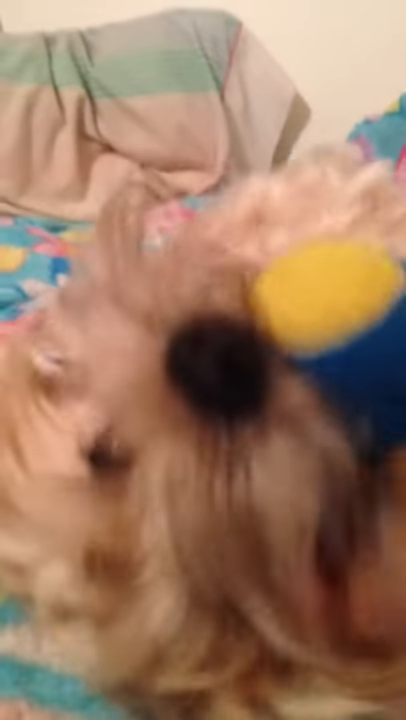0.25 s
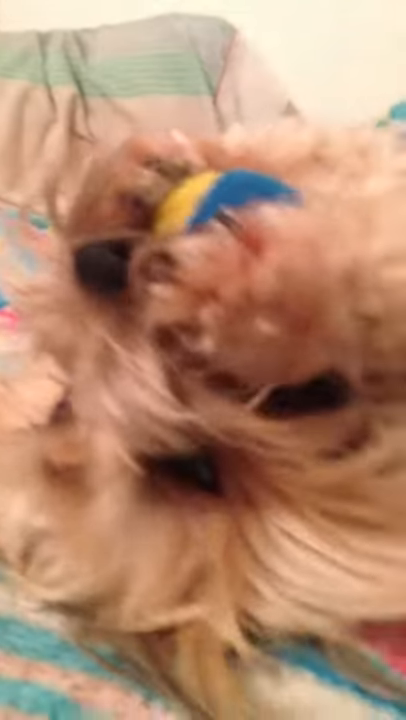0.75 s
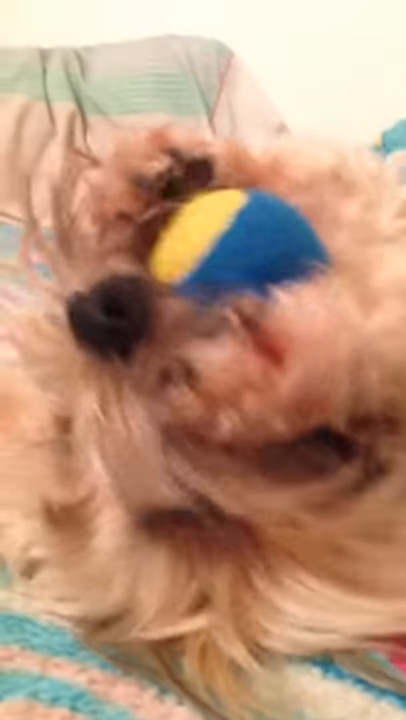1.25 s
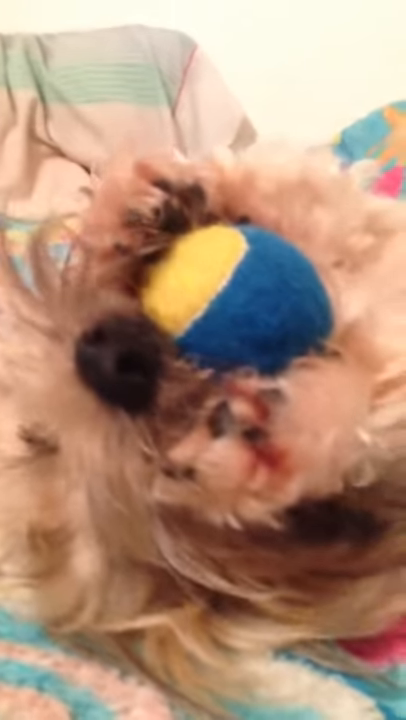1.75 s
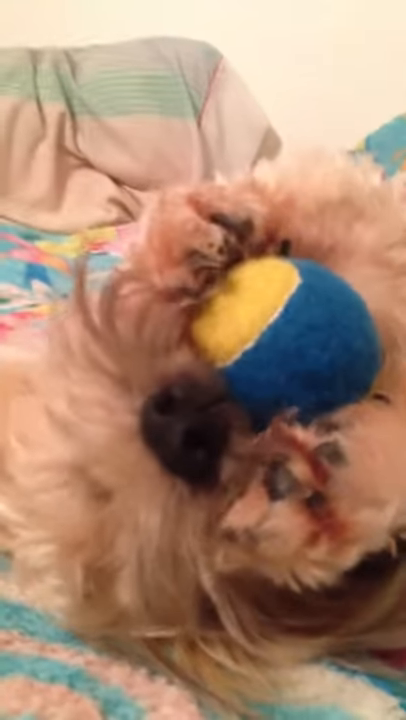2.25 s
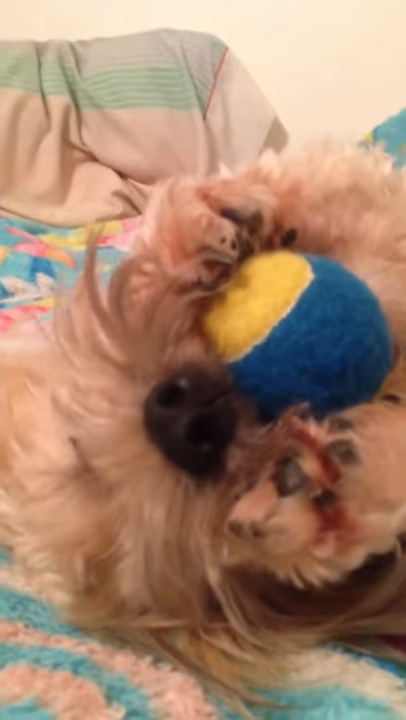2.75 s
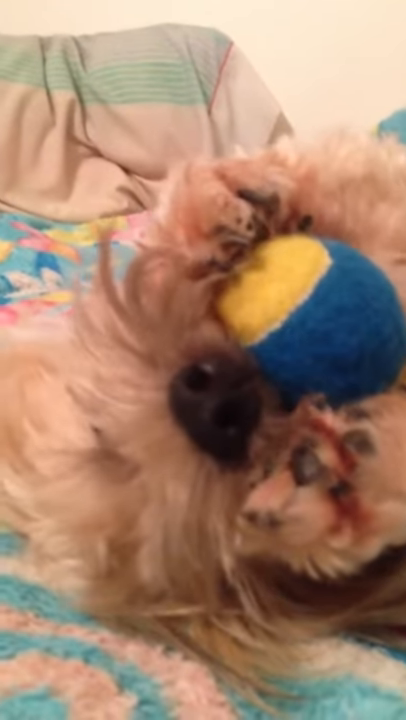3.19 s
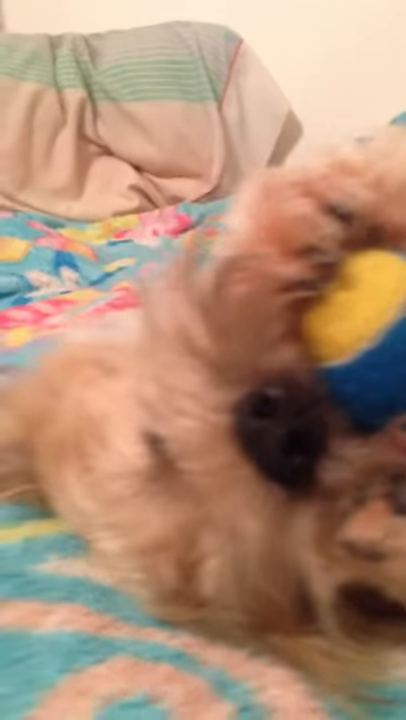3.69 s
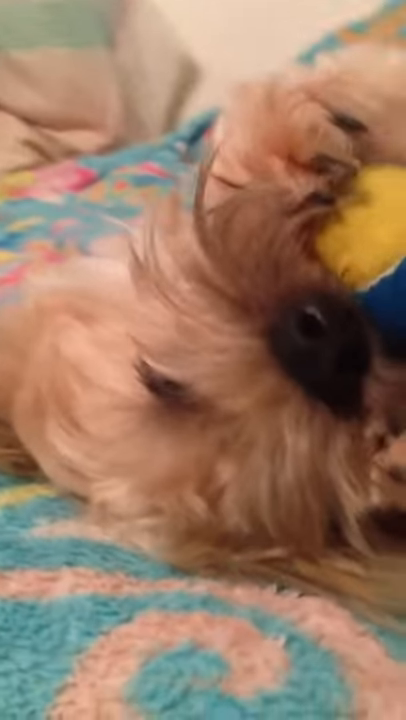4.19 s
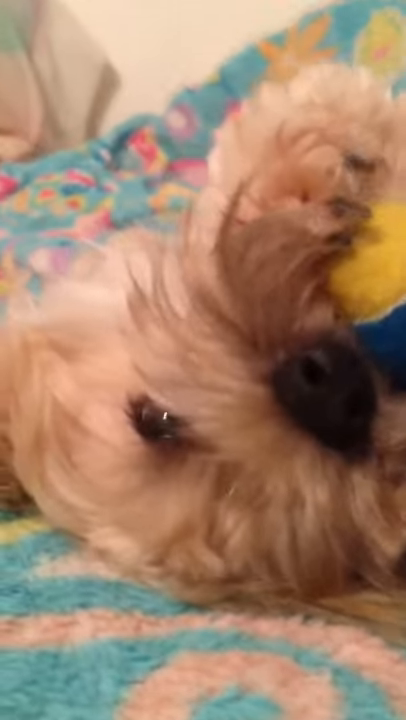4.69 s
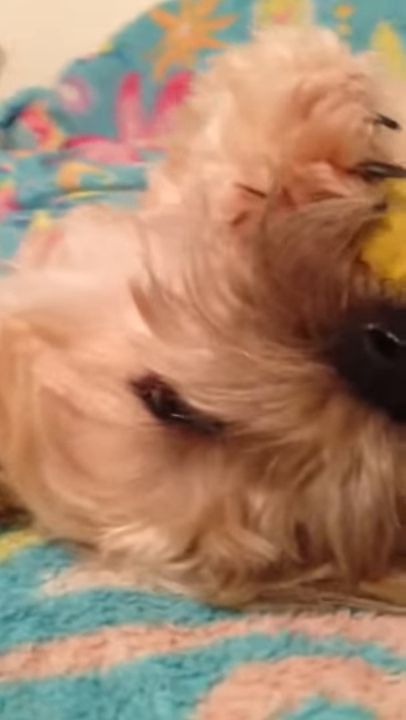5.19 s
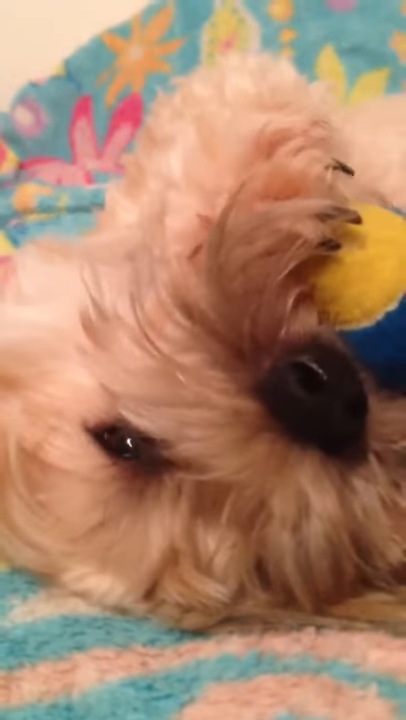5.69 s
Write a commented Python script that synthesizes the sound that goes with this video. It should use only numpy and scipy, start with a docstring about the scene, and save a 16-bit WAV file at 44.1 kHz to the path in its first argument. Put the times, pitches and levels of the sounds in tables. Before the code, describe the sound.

Near-silent chewing with thin airy whistles gives way to four sharp, high toy squeaks, each answered by a softer squeak as the ball springs back.

```python
"""Dog chewing a squeaker ball

A small dog lies on a blanket and chews a squeaker ball, close to the microphone in a quiet, soft room.
A slow squeeze leaks air in thin whistles. Then four quick bites blow the reed: it climbs, shuts with a thump
and sounds again as the jaw eases. Each time the ball springs back, it sucks air through the reed in a squeak.
The reed is a sum of harmonics plus pulsing air noise; leaks are wavering sines; rubs and room are shaped noise."""
import sys
import numpy as np
from scipy import signal
from scipy.fft import rfft, irfft, next_fast_len
from scipy.io import wavfile
from scipy.ndimage import uniform_filter1d, map_coordinates

SR = 44100
rng = np.random.default_rng(int(sys.argv[2]) if len(sys.argv) > 2 else 0)


def pcm_store(signal):
    """Save signal as 16-bit PCM."""
    levels = np.round(np.clip(np.atleast_2d(signal), -1, 1) * 32767)
    wavfile.write(sys.argv[1], SR, levels.astype(np.int16).T)


N = 261954  # length in samples
TOP_HZ = 15450  # upper band limit


def amp(db):
    """Turn decibels into gain."""
    return 10 ** (np.asarray(db) / 20)


def unit(x):
    """Scale to an average (rms) level of 1."""
    return x / np.sqrt(np.mean(x ** 2) + 1e-20)


def along(points, hz):
    """Read (pitch_hz, value) points between their entries, on a log pitch axis."""
    point_hz, values = np.transpose(points)
    return np.interp(np.log(hz + 1), np.log(point_hz + 1), values)


def trace(rows):
    """Draw each column after the time, sample by sample from the first row to the last."""
    row_s, *columns = np.transpose(rows)
    t = np.arange(row_s.min(), row_s.max(), 1 / SR)
    return [np.interp(t, row_s, column) for column in columns]


def clock(length_s):
    """Give the time in seconds and the share 0-1 of a stroke this long."""
    t = np.arange(int(length_s * SR)) / SR
    return t, t / t[-1]


def add(track, start_s, sound):
    """Mix a sound into the track."""
    part = track[max(round(start_s * SR), 0):][:len(sound)]
    part += sound[:len(part)]


def faded(x, edge):
    """Fade a sound in and out over edge seconds."""
    t = np.arange(len(x)) / SR
    return x * np.clip(np.minimum(t, t[::-1]) / edge, 0, 1)


def wobble(n, rate):
    """Draw a smooth random curve with rate random points a second."""
    knots = rng.standard_normal(int(n * rate / SR) + 4)
    return map_coordinates(knots, [np.arange(n) * rate / SR])


def noise(n, spectrum):
    """Shape white noise by a spectrum and scale it to rms 1."""
    m = next_fast_len(n + SR // 8)
    gain = amp(along(spectrum, np.fft.rfftfreq(m, 1 / SR)))
    shaped = irfft(rfft(rng.standard_normal(m)) * gain, m)
    return unit(shaped)[:n]


def causal(spectrum, hz, size=2048):
    """Complex gain of a passive body with this spectrum: it answers only after it is struck (minimum phase)."""
    grid = np.fft.rfftfreq(size, 1 / SR)
    cepstrum = irfft(np.log(amp(along(spectrum, grid))))
    return np.exp(np.interp(hz, grid, rfft(2 * cepstrum[:size // 2], size)))


# Tone colour of air rushing past the reed: pitch_hz, level_db
AIR_COLOUR = [(100, -39), (800, -33.5), (1400, -22), (2400, -8), (4000, 3), (6500, 4.5), (9500, 7),
              (11000, -1), (12500, -7.5), (15500, -17.5)]


def reed(hz, tone_db, air_db, horn, jitter, dulling):
    """The reed slaps once a cycle into its little horn; turbulent air passes in step with it."""
    n = len(hz)
    hz = hz * (1 + jitter * amp(air_db - tone_db) * wobble(n, 810))  # turbulence unsettles a weak beat
    phase = 2 * np.pi * np.cumsum(hz) / SR
    k = np.arange(1, 19)[:, None]  # harmonic numbers
    # A weak blow shuts the reed gently, which dulls the high harmonics
    softness = amp(-dulling * (tone_db.max() - tone_db) * np.log2(k))
    partials = causal(horn, k * hz) * softness * (k * hz < TOP_HZ)
    pulses = (partials * np.exp(1j * k * phase)).real.sum(0)
    pulses = pulses / np.sqrt((abs(partials) ** 2).sum(0) / 2)  # even level whatever the colour
    tone = amp(tone_db + .5 * wobble(n, 700)) * pulses
    air = amp(air_db) * unit(noise(n, AIR_COLOUR) * (1 + .5 * np.cos(phase)))
    return faded(tone + air, edge=0.00093)


# The jaw closes on the ball:
# start_s, length_s, time_to_overblow_s, highest_pitch_hz, level_db, lead_of_first_puff_s, thump_db
BITES = [(2.5193, .05, 0.042, 2090, -8, 0.046, -23.5), (3.249, 0.053, 0.039, 3800, -7, 0.029, -21),
         (4.2198, .048, .038, 3800, -7.5, .031, -23), (5.195, 0.055, 0.041, 3800, -8, 0.052, -27)]
# Tone colour of the reed when blown: pitch_hz, level_db
BLOWN_COLOUR = [(300, -36), (900, -16), (1250, -8), (2500, 1.5), (3800, 2.5), (5100, 1), (6400, 1.5),
                (8800, 5.5), (10200, 1), (11500, -9.5), (13000, -16), (15500, -27.5)]
REED_HZ, CREEP_HZ_PER_S = 1222, 2300  # the reed's own pitch and its slow rise under pressure
JUMP_HZ, JUMP_S = 1068, .0011  # overblown, it jumps almost an octave
CLIMB_HZ, CLIMB_S = 1356, .012  # then it climbs by this many Hz in the first 12 ms, ever faster
PRESS_SWELL_DB = 7.5  # growth of the tone
PRESS_AIR_DB, PRESS_AIR_SWELL_DB = -14, 11.5  # air noise relative to the tone at the top, and its extra growth


def presses():
    """Pressure builds: the reed grows louder and airier, creeps upward, then overblows and climbs."""
    out = np.zeros(N)
    for start_s, length_s, overblow_s, top_hz, level_db, *_ in BITES:
        t, _ = clock(length_s)
        jump = (1 + np.tanh((t - overblow_s) / JUMP_S / 2)) / 2
        climb = (np.maximum(t - overblow_s, 0) / CLIMB_S) ** 2
        hz = REED_HZ + CREEP_HZ_PER_S * t + JUMP_HZ * jump + CLIMB_HZ * climb
        hz = np.minimum(hz, top_hz)
        to_go = np.maximum(1 - t / overblow_s, 0)
        tone_db = level_db - PRESS_SWELL_DB * to_go
        air_db = tone_db + PRESS_AIR_DB - PRESS_AIR_SWELL_DB * to_go
        add(out, start_s, reed(hz, tone_db, air_db, BLOWN_COLOUR, jitter=0.028, dulling=0.055))
    return out


# The jaw eases and the reed sounds again:
# start_s, length_s, first_pitch_hz, fall_curve (1 = even), level_db, fade_db, air_noise_db, thump_db
JAW_EASES = [(2.5695, .0475, 2075, 1.08, -7, 8.1, -28.5, -24.5),
             (3.324, 0.04, 2940, 1.9, -6.5, 7.3, -22.5, -21.5),
             (4.297, .034, 2955, 1.9, -7, 7.7, -25.5, -28),
             (5.274, .0352, 2975, 1.74, -7.5, 6.1, -24.5, -27.5)]
SLACK_HZ, SNAP_HZ = 1024, 3900  # lowest and last pitch
SLACK_AT, SLACK_CURVE = .53, 1.8  # share of the stroke at the lowest pitch, curve of the rise
SLACK_DIP_DB, SLACK_WIDTH = 14, .18  # dip where the reed is slack, and its width as a share of the stroke


def eases():
    """Pitch and level sink as the reed goes slack, then rise until it snaps shut."""
    out = np.zeros(N)
    for start_s, length_s, first_hz, fall_curve, level_db, fade_db, air_db, _ in JAW_EASES:
        _, share = clock(length_s)
        falling = np.maximum(1 - share / SLACK_AT, 0)
        rising = np.maximum((share - SLACK_AT) / (1 - SLACK_AT), 0)
        fall = (first_hz / SLACK_HZ) ** (falling ** fall_curve)
        rise = (SNAP_HZ / SLACK_HZ) ** (rising ** SLACK_CURVE)
        hz = SLACK_HZ * fall * rise
        slack_dip = SLACK_DIP_DB * np.exp(-((share - SLACK_AT) / SLACK_WIDTH) ** 2)
        tone_db = level_db - fade_db * share - slack_dip
        add(out, start_s, reed(hz, tone_db, air_db, BLOWN_COLOUR, jitter=0.061, dulling=0.084))
    return out


# The ball springs back fast after a bite: start_s, length_s, first_pitch_hz (before the kick), level_db, fade_db
FAST_REFILLS = [(2.681, 0.078, 2306, -14, 12), (3.429, .08, 2293, -14.5, 10.5),
                (4.393, 0.087, 2303, -14, 11.5), (5.425, 0.08, 2310, -15.5, 10)]
# The ball fills gently after the slow squeeze: same columns
GENTLE_REFILLS = [(1.922, 0.066, 1243, -21, 0.91)]
# Tone colour of the reed when sucked: pitch_hz, level_db
SUCKED_COLOUR = [(300, -38), (900, 6), (1250, -8.5), (2400, 0), (3800, 0), (5000, -3), (6300, -2.5),
                 (7600, -12.5), (8800, -8), (10100, -0.5), (11300, -8.5), (12600, -8.5), (15200, -16.5)]
# Tone colour of the reed when gently sucked: pitch_hz, level_db
GENTLE_COLOUR = [(300, -35.5), (900, 4.5), (1250, -8), (2500, 0.5), (3800, -2), (5000, -5.5), (6300, -6),
                 (7550, -15), (8800, -4.5), (10100, -2.5), (11300, -2.5), (12600, -7), (13800, -14.5),
                 (15200, -18)]
SUCKED_HZ, SETTLE_S, SETTLE_CURVE = 1264, .0235, 1.9  # pitch the sucked reed settles on, how fast, shape
SAG_CURVE, SAG_HZ, SAG_DB = 5.8, 407.3, 16.5  # lateness of the last sag, its fall of pitch and of level
KICK_S = .0018  # a sudden release overshoots in pitch this briefly


def refills(strokes, horn, kick_hz, air_db, jitter, dulling):
    """Suction is strongest at first: the pitch settles on the reed's own, then sags and dies as the ball fills."""
    out = np.zeros(N)
    for start_s, length_s, first_hz, level_db, fade_db in strokes:
        t, share = clock(length_s)
        sag = share ** SAG_CURVE
        settling = (first_hz - SUCKED_HZ) * np.exp(-(t / SETTLE_S) ** SETTLE_CURVE)
        kick = kick_hz * np.exp(-t / KICK_S)
        hz = SUCKED_HZ + settling + kick - SAG_HZ * sag
        tone_db = level_db - fade_db * share - SAG_DB * sag
        add(out, start_s, reed(hz, tone_db, tone_db + air_db, horn, jitter, dulling))
    return out


# Faint ring of the squeaker: pitch_hz, level_db (before a 13 dB cut), time_to_fall_60_db_s
RING_MODES = [(5170, -37, .09), (8900, -30.5, 0.14)]


def squeaker_ring(x):
    """The squeaker keeps ringing faintly at its own modes."""
    t = np.arange(SR // 4) / SR
    ring = np.zeros(len(t))
    for hz, level_db, fall_s in RING_MODES:
        ring += amp(level_db - 13.0 - 60 * t / fall_s) * np.sin(2 * np.pi * hz * t)
    return signal.fftconvolve(x, ring)[:N]


def whistle(hz, waver):
    """An edge tone of about rms 1 whose pitch wavers with the jet."""
    wavering_hz = hz * (1 + waver * wobble(len(hz), 400))
    return np.sqrt(2) * np.sin(2 * np.pi * np.cumsum(wavering_hz) / SR)


def shuts():
    """List (start_s, thump_db) where the reed stops the flow: as it overblows and at the end of each ease."""
    overblown = [(start_s + overblow_s, db) for start_s, _, overblow_s, *_, db in BITES]
    snapped = [(start_s + length_s - .0015, db) for start_s, length_s, *_, db in JAW_EASES]
    return overblown + snapped


# Air whistles past the shut reed at the height of a bite: start_s, length_s, whistle_db, air_noise_db
CHOKED_WHISTLES = [(3.3007, 0.028, -15.5, -19.5), (4.2648, .0112, -18, -17.5), (5.25, .0248, -16, -20.5)]
# Tone colour of the open port: pitch_hz, level_db
PORT_COLOUR = [(1000, -16.5), (7000, -14), (9400, -5), (11000, -13.5), (16000, -31)]
# The reed's upper mode screeches in the first bite: start_s, length_s, level_db
SCREECH_BURST = (2.5335, .029, -14.5)
# Tone colour of that upper mode: pitch_hz, level_db
SCREECH_COLOUR = [(3000, -52.5), (5800, -17.5), (6700, 0.5), (8500, 1), (9600, -4.5), (11000, -15.5),
                  (16000, -29.5)]
CHOKE_HZ, CHOKE_PEAK_S, CHOKE_ARCH_HZ = 5480, .0092, 510  # top of the whistle's arch, when it comes, its height
PUFF_DB = -55.5  # air starts to move before a bite


def escaping_air():
    """Air that bypasses the reed's beat: first puffs, choked whistles, last hisses and a screech."""
    out = np.zeros(N)
    for start_s, length_s, whistle_db, air_db in CHOKED_WHISTLES:
        t, _ = clock(length_s)
        hz = CHOKE_HZ - CHOKE_ARCH_HZ * (t / CHOKE_PEAK_S - 1) ** 2
        tone = whistle(hz, waver=.008) + amp(-12.5) * whistle(2 * hz, waver=0.0066)
        choked = amp(whistle_db) * tone + amp(air_db) * noise(len(t), AIR_COLOUR)
        add(out, start_s, faded(choked, edge=0.00044))
    for start_s, *_, lead_s, _ in BITES:
        puff = faded(noise(int(0.055 * SR), PORT_COLOUR), edge=0.009)
        add(out, start_s - lead_s, amp(PUFF_DB) * puff)
    t, _ = clock(.1)
    for start_s, thump_db in shuts():
        # The last hiss falls 60 dB in 0.04 s
        add(out, start_s, amp(thump_db - 60 * t / 0.04) * noise(len(t), AIR_COLOUR))
    start_s, length_s, level_db = SCREECH_BURST
    screech = faded(noise(int(length_s * SR), SCREECH_COLOUR), edge=.002)
    add(out, start_s, amp(level_db) * screech)
    return out


def leak(hz, level_db):
    """A thin, unsteady, airy whistle."""
    unsteady = unit(1 + .35 * wobble(len(hz), 50) + .55 * wobble(len(hz), 450))
    return faded(amp(level_db - .5) * whistle(hz, waver=0.0088) * unsteady, edge=.014)


# Short thin whistles from the slowly squeezed ball:
# start_s, length_s, first_pitch_hz, last_pitch_hz, rise_at_swell_hz, level_db (before a 0.5 dB cut)
SHORT_LEAKS = [(.3, 0.15, 5230, 4930, -4, -71), (.33, .12, 7270, 6730, -38, -64),
               (0.451, 0.084, 4680, 5060, 40, -66), (0.456, 0.07, 6800, 6550, 132, -69),
               (0.878, .032, 4150, 3980, 20, -59), (1.44, .145, 4680, 5190, 170, -61),
               (1.506, .25, 6270, 6170, 209.5, -66.5), (1.56, .18, 4300, 4080, -9, -71.5),
               (1.742, 0.071, 4760, 4740, 39, -63)]
# The longest leak sinks as the ball empties: time_s, pitch_hz, level_db (before a 2.5 dB cut in all)
SINKING_LEAK = [(0.53, 4463, -58), (0.556, 3970, -60), (0.576, 4300, -58), (0.594, 4270, -55),
                (0.614, 3884, -53.5), (0.658, 4090, -55), (0.678, 3737, -60), (0.732, 3880, -56),
                (0.758, 3639, -65.5), (0.88, 3652, -69)]


def leaks():
    """Under slow pressure the reed stays still; leaks swell, glide and fade."""
    out = np.zeros(N)
    for start_s, length_s, first_hz, last_hz, rise_hz, level_db in SHORT_LEAKS:
        _, share = clock(length_s)
        swell = 4 * share * (1 - share)
        hz = first_hz + (last_hz - first_hz) * share + rise_hz * swell
        add(out, start_s, np.sqrt(swell) * leak(hz, level_db))
    hz, level_db = trace(SINKING_LEAK)
    add(out, SINKING_LEAK[0][0], leak(hz, level_db - 2.0))
    return out


# The ball's dull answer, before the low cut: pitch_hz, level_db
THUMP_COLOUR = [(40, -49), (90, -23.5), (130, -9), (175, 2.5), (260, -1.5), (380, -10.5), (600, -16.5),
                (900, -41.5), (2000, -51)]
# Teeth on the ball: start_s, level_db, pitch_hz, time_to_fall_60_db_s
TOOTH_TAPS = [(0.0595, -37, 674, 0.0049), (0.103, -35, 656, 0.02), (1.8943, -32.5, 780, 0.0077)]


def thumps():
    """The ball thumps whenever the reed shuts; teeth tap on it with a short ring and a noisy tick."""
    out = np.zeros(N)
    t = np.arange(SR // 10) / SR
    thump = irfft(causal(THUMP_COLOUR, np.fft.rfftfreq(len(t), 1 / SR), size=16384))
    for start_s, thump_db in shuts():
        add(out, start_s, amp(thump_db) * thump / abs(thump).max())
    for start_s, level_db, hz, fall_s in TOOTH_TAPS:
        ring = np.sin(2 * np.pi * hz * t) * amp(-60 * t / fall_s)
        tick = amp(-21.5 - 60 * t / 0.0035) * rng.standard_normal(len(t))
        add(out, start_s, amp(level_db) * (ring + tick))
    low_cut = signal.butter(2, 100, "highpass", fs=SR, output="sos")
    return signal.sosfilt(low_cut, out)


# Soft rubs and bumps of the dog on the blanket: start_s, length_s, level_db, pitch_hz, fall_per_octave_above_db
BLANKET_RUBS = [(4.365, 0.07, -55.5, 358, 23), (4.829, 0.34, -67.5, 1500, 9),
                (5.167, 0.052, -50.5, 320, 21.5), (5.19, 0.092, -40.5, 168, 20)]


def blanket():
    """Dull rubs as the dog's weight shifts: low noise that swells and fades."""
    out = np.zeros(N)
    for start_s, length_s, level_db, hz, fall_db in BLANKET_RUBS:
        n = int(length_s * SR)
        rub = noise(n, [(hz / 3, -28), (hz, 0), (2 * hz, -fall_db), (10 * hz, -3 * fall_db)])
        add(out, start_s, amp(level_db) * unit(rub * np.hanning(n)))
    return out


def near_surfaces(x, count=8):
    """Weak, quick echoes from the bed, the dog's body and the wall, at random short delays."""
    out = np.zeros(N)
    delays_s = rng.uniform(0.0012, 0.017, count)
    signs = rng.choice([-1, 1], count)
    for delay_s, sign in zip(delays_s, signs):
        add(out, delay_s, sign * x / np.sqrt(count))
    return out


# How fast the room dies away: pitch_hz, time_to_fall_60_db_s
TAIL_DECAY = [(200, 0.25), (1500, 0.26), (5000, 0.2), (9000, 0.23), (15000, 0.092)]
# Tone colour of the room's answer: pitch_hz, level_db
TAIL_COLOUR = [(150, -5), (1200, 2.5), (2500, 2.5), (5000, -1), (9000, -8), (13000, 1.5)]


def room(x):
    """The short answer of a furnished room: a shared tail, very slightly widened in the treble."""
    hz, t, z = signal.stft(rng.standard_normal((2, SR // 2)), SR, nperseg=256)
    fall_s = along(TAIL_DECAY, hz)[:, None]
    z = z * amp(along(TAIL_COLOUR, hz)[:, None] - 60 * t / fall_s)
    width = amp(along([(3000, -55), (5500, -38)], hz))[:, None]
    tails = signal.istft(np.array([z[0], z[1] * width]), SR, nperseg=256)[1]
    tails = tails / np.linalg.norm(tails[0])
    tails = np.pad(tails, ((0, 0), (int(0.0028 * SR), 0)))  # the tail starts 2.8 ms late
    mid, side = signal.fftconvolve(x[None], tails, axes=1)[:, :N]
    return np.array([mid + side, mid - side])


# Tone colour of the low indoor rumble: pitch_hz, level_db
RUMBLE_COLOUR = [(15, -71), (25, -41.5), (60, -48.5), (85, -26), (94, -23.5), (104, -10), (168, 1.5),
                 (237, -4.5), (267, -12.5), (432, -22), (502, -18), (628, -32.5), (860, -23), (900, -29.5),
                 (1170, -59.5), (1980, -120)]
# Tone colour of the thin hiss: pitch_hz, level_db
HISS_COLOUR = [(350, -30.5), (600, -0.5), (820, -6.5), (1120, -3.5), (1320, -4), (2750, -5), (14700, -12),
               (15500, -14.5)]
RUMBLE_DB, HISS_DB = -53.5, -66


def background():
    """A steady low indoor rumble and a thin hiss, both shaped noise."""
    return amp(RUMBLE_DB) * noise(N, RUMBLE_COLOUR) + amp(HISS_DB) * noise(N, HISS_COLOUR)


def scene():
    """Bites blow air out; the springing ball draws it back in with opposite pressure."""
    blown = presses() + eases()
    drawn = refills(FAST_REFILLS, SUCKED_COLOUR, kick_hz=553, air_db=-14, jitter=.035, dulling=0.1)
    drawn = drawn + refills(GENTLE_REFILLS, GENTLE_COLOUR, kick_hz=0, air_db=-22.5, jitter=0.032, dulling=.12)
    ball = drawn + squeaker_ring(drawn) - blown
    ball = ball + leaks() + escaping_air() + thumps() + blanket()
    return ball + amp(-18) * near_surfaces(ball) + amp(-20.0) * room(ball) + background()


LIMIT_DB, LIMIT_WINDOW_S, RECOVER_DB_PER_S = -13, 0.0069, 2.5  # ceiling, averaging time, recovery


def gain_control(x):
    """Loud squeaks turn the gain down at once; it creeps back slowly."""
    power = abs(uniform_filter1d(x.mean(0) ** 2, int(LIMIT_WINDOW_S * SR)))
    excess_db = np.maximum(10 * np.log10(power + 1e-12) - LIMIT_DB, 0)
    recovery_db = RECOVER_DB_PER_S * np.arange(N) / SR
    return x * amp(recovery_db - np.maximum.accumulate(excess_db + recovery_db))


def record(dry):
    """The recorder rides its gain, rounds high peaks, drops the deepest bass and cuts above its band limit."""
    held = gain_control(dry)
    rounded = held / (1 + abs(held / .8) ** 6) ** (1 / 6)
    low_cut = signal.butter(2, 60, "highpass", fs=SR, output="sos")
    rounded = signal.sosfilt(low_cut, rounded)
    m = next_fast_len(N + SR // 2)
    band = np.clip((TOP_HZ - np.fft.rfftfreq(m, 1 / SR)) / 300 + .5, 0, 1)  # a 300 Hz wide slope
    return irfft(rfft(rounded, m) * band, m)[:, :N]


dry = scene()
out = record(dry)
pcm_store(out)
```